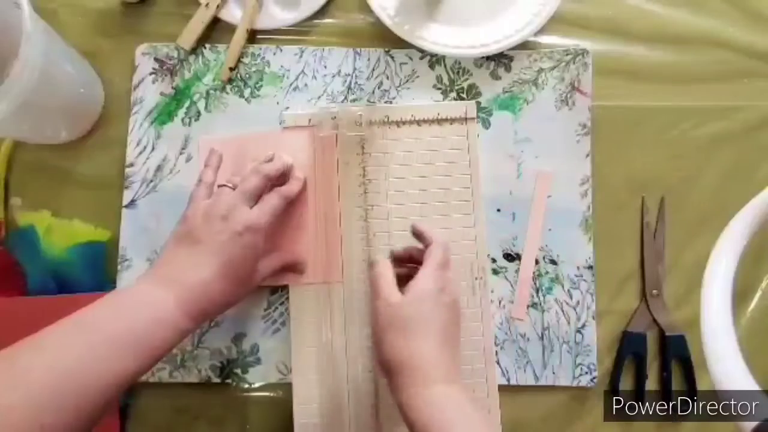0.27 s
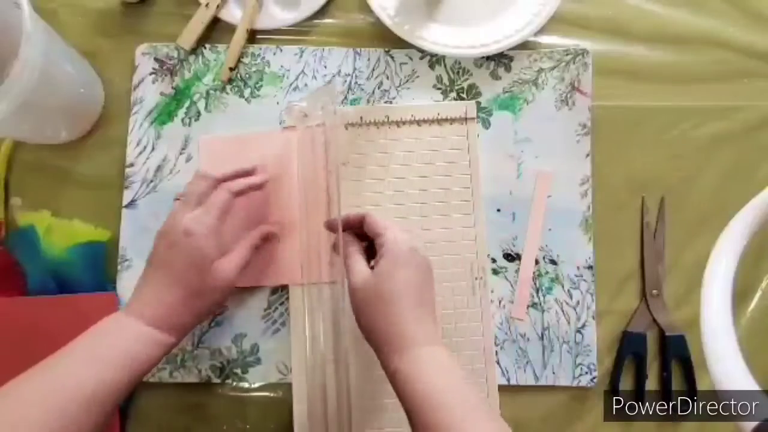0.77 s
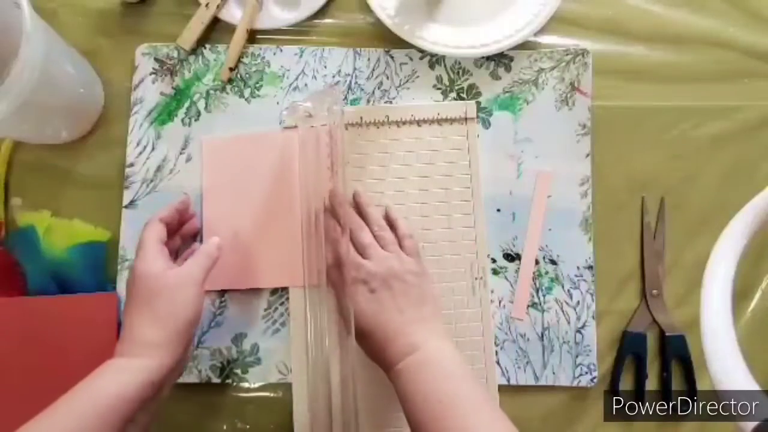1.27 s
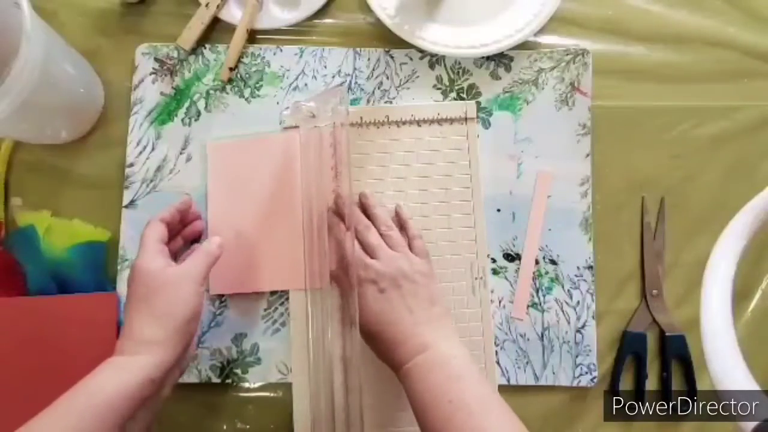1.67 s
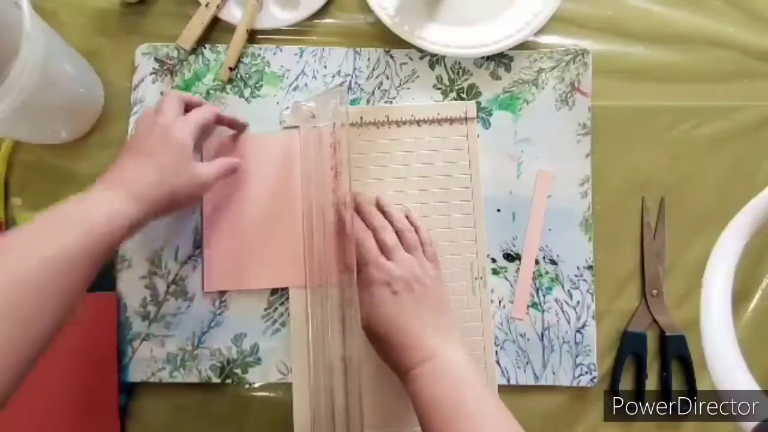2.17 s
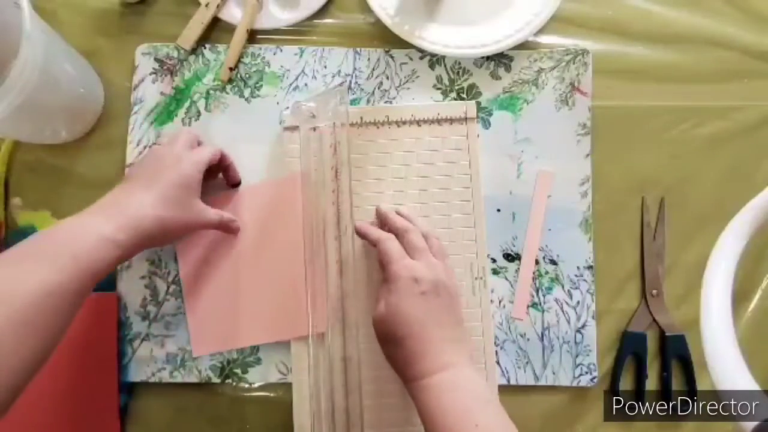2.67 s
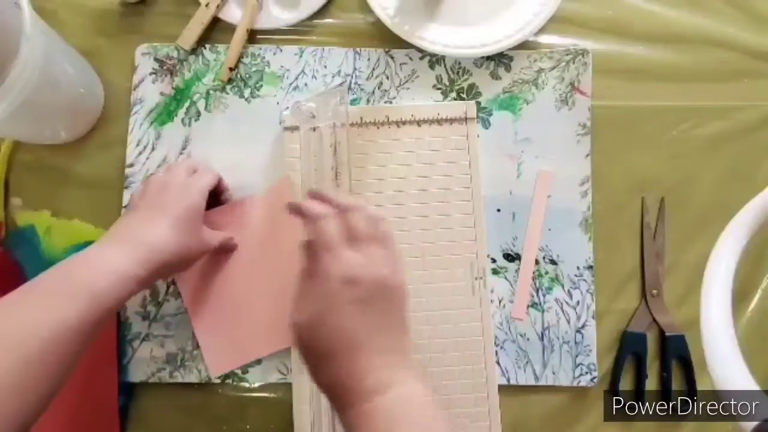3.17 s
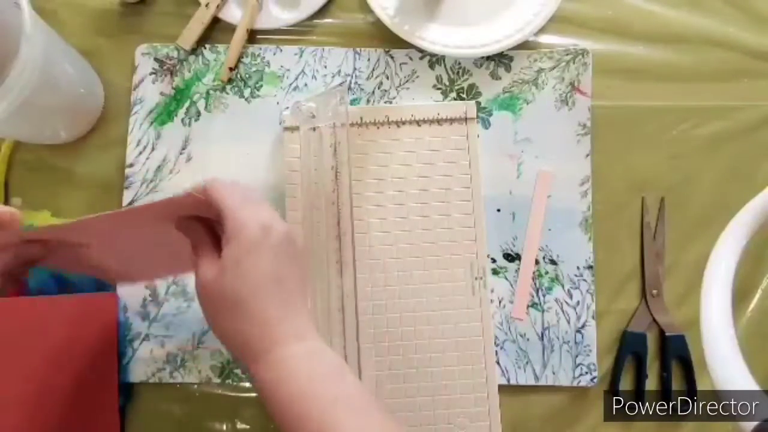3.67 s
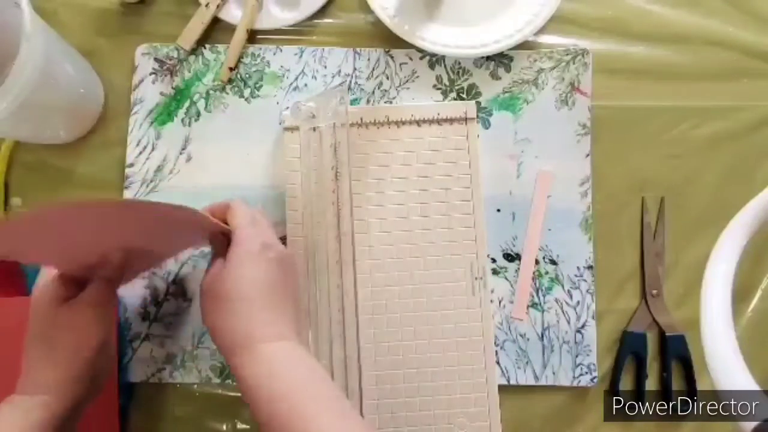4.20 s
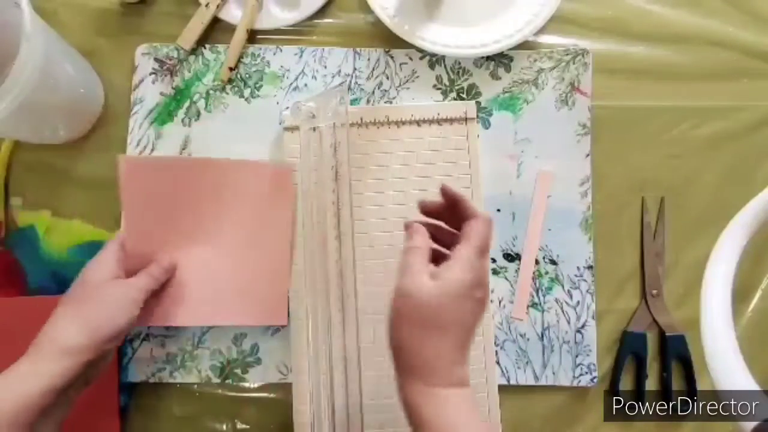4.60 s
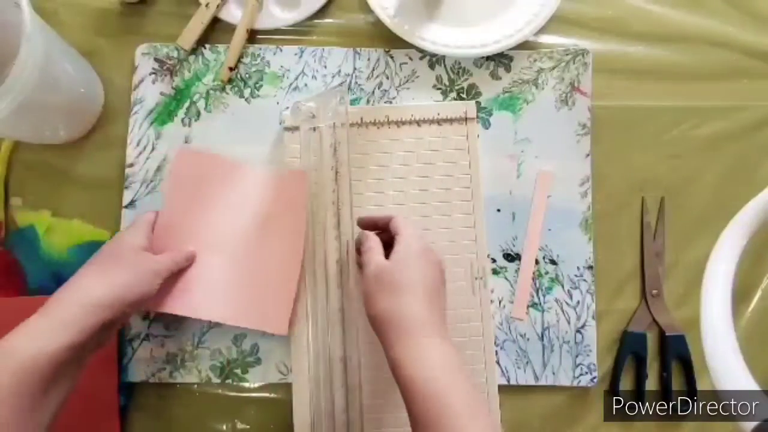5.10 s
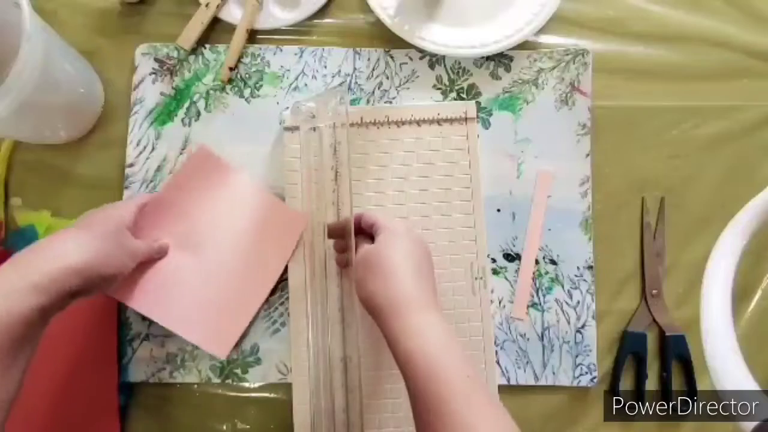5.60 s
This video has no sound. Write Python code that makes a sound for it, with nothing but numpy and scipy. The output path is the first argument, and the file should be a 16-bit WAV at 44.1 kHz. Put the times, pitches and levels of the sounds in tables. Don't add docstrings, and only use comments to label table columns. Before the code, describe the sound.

Close view of a table in a small room: a paper trimmer's rail slams at the very start, rattling briefly. Two light knocks follow, then faint rubbing of fingers on card. The card scrapes out from under the rail, then is lifted and flexed with crisp snaps, a soft flap and taps, ending in sparse light ticks over low hum.

```python
import sys
import numpy as np
from scipy import signal
from scipy.fft import rfft, irfft, next_fast_len
from scipy.io import wavfile
from scipy.ndimage import uniform_filter1d, map_coordinates

SR = 44100
rng = np.random.default_rng(int(sys.argv[2]) if len(sys.argv) > 2 else 0)


def field_ratio(decibels):
    return 10 ** (np.asarray(decibels, dtype=float) / 20)


def store_pcm(level_fs):
    pcm = np.round(np.clip(level_fs, -1, 1) * 32767).astype(np.int16)
    wavfile.write(sys.argv[1], SR, np.atleast_2d(pcm).T)


N = 257984

# [f/Hz, T60/s]
SLAM_SPECTRUM = [(15, -25), (30, -4.5), (130, -19.5), (300, -11.5), (450, -5), (720, -18.5), (1100, -13.5),
                 (1400, -25), (1750, -15), (3240, -25), (6680, -26), (15400, -23.5)]
SLAM_T60 = [(40, 0.54), (280, 0.35), (740, 0.36), (2000, 0.27), (5000, 0.28), (13000, 0.26)]
SLAM_MODES = [(1750, 61, 0), (2240, 28, -3), (2480, 130, -4), (3600, 91, -7), (3870, 56, -9),
              (4530, 47, -7), (5670, 100, -11), (6740, 45, -8)]
# [t/s, level/dB, f/Hz, T60/s]
THUMPS = [(0.00097, -33.5, 35, 0.22), (0.055, -41, 62, 0.12), (0.085, -39.5, 55, 0.11),
          (0.58, -47.5, 530, 0.046), (0.74, -51, 520, 0.04), (4.2115, -38, 940, 0.015),
          (4.2178, -39, 460, 0.03), (3.9545, -36.5, 330, 0.04), (0.3952, -41, 560, 0.017),
          (0.48, -44, 127, 0.11), (0.4122, -28, 557, 0.035), (0.4418, -27.5, 450, 0.03),
          (2.3015, -41, 168, 0.06), (2.293, -35, 73, 0.2), (2.292, -36, 175.4, 0.079),
          (0.611, -59, 2420, 0.06), (0.614, -52.5, 560, 0.05), (0.74, -56.5, 2400, 0.066),
          (0.86, -50.5, 490, 0.094), (2.751, -50.5, 503, 0.19)]

# [f/Hz, bandwidth/Hz, level/dB]
HUM_LOAD = [(0, -68), (.42, -62), (.73, -67), (1.21, -60), (2.2, -56), (2.3, -51), (2.59, -48.5),
            (2.83, -58.5), (3.27, -58), (3.63, -68), (3.84, -53), (4.56, -70.5), (5.85, -61.5)]
HUM_TONES = [(147.6, 24.7, -67.5), (257.2, 4, -80), (306.6, 7, -77)]
# [f/Hz, level/dB]
RUMBLE_SPECTRUM = [(12, -35.5), (25, -3), (50, 1.5), (80, -6), (110, -5.5), (200, -47.5)]
CREAK_SPECTRUM = [(80, -53.5), (115, 4.5), (160, -2.5), (250, -3.5), (400, -43.5)]
AIR_SPECTRUM = [(120, -33), (200, -10), (358, 5), (437, -22), (524, -6), (584, -26), (1010, -27),
                (1170, -36), (15400, -53.5)]
# [peak t/s, rumble level/dB, rise/s, fall/s, creak over rumble/dB]
LEANS = [
    (.06, -39, 0.18, 0.084, -7),
    (.6, -60, 0.57, 1.7, -14),
    (3.84, -51, 0.39, 0.57, -3),
    (4.03, -54.5, 0.5, 2.3, -15.5),
    (5.5, -44.5, 0.078, 0.37, -31),
]

# [f/Hz, bandwidth/Hz, level/dB]
SHEET = [(1588, 770, -4.5), (2050, 347, 1.5), (2445, 560, -4.5)]
RAIL = [(2827, 790, 0), (3220, 646, 4), (3810, 1120, -1)]
EDGE = [(5610, 2960, 1.5), (6430, 88, -10), (9030, 2300, -5.5), (12260, 8200, -1.5)]
BOARD = [(300, 203, -3), (423, 74, 2.5), (555.6, 105, 0), (770.3, 31, 1.5), (968, 190, -5)]
HOLLOW = [(295, 34, 1.5), (423, 286, -2.5), (544, 123, 1.5), (1150, 380, -13.5)]
CARD = [(425, 73, 3.5), (650, 180, -3.5), (980, 320, 6), (1220, 760, -1)]

DRAGS = [(.27, -79, 0.22, 0.22), (.425, -50, 0.026, 0.052), (1.21, -66.5, 0.047, 0.23),
         (1.41, -64.5, 0.079, 0.074), (1.52, -61, 0.14, 0.12), (1.66, -73, 0.092, 0.13),
         (1.9, -66.5, 0.11, 0.26), (2.33, -59, 0.025, 0.32), (2.534, -49, 0.19, 0.056),
         (2.881, -49, 0.03, 0.051), (3.012, -61.5, 0.019, 0.028), (3.245, -52, 0.011, 0.15),
         (3.35, -55.5, 0.32, 0.42), (3.5, -73, .21, .41), (3.724, -60.5, 0.55, 0.11),
         (3.957, -47, 0.006, 0.07), (4.179, -52.5, 0.04, .2), (4.24, -53, 0.16, 0.14),
         (4.47, -47.5, 0.02, 0.086), (4.691, -57, 0.05, .04), (4.781, -63, 0.036, 0.047),
         (5.03, -64, 0.069, 1), (5.246, -56, 0.033, 0.033), (5.366, -57.5, 0.07, 0.037),
         (5.577, -56.5, 0.16, 0.054), (5.741, -56, 0.11, 0.16)]
SCRAPES = [(0.743, -71, 0.027, 0.029), (1.2, -68, 0.064, 0.13), (1.29, -69.5, 0.14, 0.076),
           (1.53, -67, 0.051, 0.067), (2.07, -63, 0.036, 0.032), (2.295, -54, 0.011, 0.046),
           (2.341, -42, 0.008, 0.11), (2.385, -48, 0.088, 0.072), (2.534, -53.5, 0.31, 0.2),
           (3.078, -51.5, 0.0044, 0.2), (2.751, -53.5, 0.018, 0.11), (2.97, -68, .12, 0.16),
           (3.47, -58, 0.049, 0.11), (3.71, -61, 0.11, 0.11), (4.097, -59.5, 0.041, 0.039),
           (4.399, -57, .08, 0.036), (5.45, -64, 0.028, 0.078), (5.79, -63.5, 0.14, 0.097)]
BRUSHES = [(0.406, -54.5, 0.02, 0.096), (.71, -69.5, 0.013, 0.12), (.98, -74.5, 0.098, 0.11),
           (1.171, -64.5, .025, 0.044), (1.3, -72.5, 0.015, 0.097), (1.795, -75.5, 0.059, 0.078),
           (1.556, -69, 0.13, 0.2), (1.662, -68.5, 0.14, 0.067), (1.898, -62.5, 0.052, .18),
           (2.215, -73.5, 0.03, 0.061), (2.44, -58, 0.16, 0.21), (2.534, -62, 0.16, 0.17),
           (2.79, -62.5, 0.049, 0.089), (2.96, -68, 0.15, 0.055), (3.227, -52.5, 0.23, 0.49),
           (3.303, -44, 0.0092, 0.06), (3.5, -54, 0.095, 0.071), (3.61, -58, 0.14, 0.42),
           (3.705, -54.5, 0.02, 0.096), (3.956, -66, .005, 0.037), (4.1, -61, 0.066, 0.057),
           (4.232, -57, 0.033, 0.19), (4.31, -56.5, 0.021, 0.025), (4.395, -61.5, 0.039, 0.051),
           (4.48, -59, 0.015, 0.055), (4.62, -75, 0.22, 0.046), (4.781, -69, 0.027, 0.015),
           (5.06, -71.5, 0.028, 0.58), (5.34, -68, 0.17, 0.33), (5.75, -64, 0.17, 0.2)]
PRESSES = [(0.4, -43.5, 0.012, 0.066), (.47, -53.5, 0.089, 0.14), (.627, -62.5, 0.025, 0.051),
           (.742, -62.5, 0.088, 0.13), (1.008, -64, 0.027, 0.057), (1.21, -65, 0.11, 0.61),
           (1.33, -64.5, 0.45, 0.1), (1.556, -58, 0.11, 0.065), (1.842, -71, 0.053, 0.052),
           (2.05, -72.5, 0.2, 0.17), (2.299, -46, 0.013, 0.16), (2.35, -51, 0.063, 0.33),
           (2.6, -57.5, 0.5, 0.31), (2.764, -52.5, 0.02, 0.068), (2.881, -52, 0.032, 0.055),
           (3.015, -62, 0.12, 0.094), (3.079, -49, .004, 0.25), (3.2, -53.5, 0.19, 0.049),
           (3.354, -53, 0.13, 0.29), (3.55, -64, 0.21, .2), (3.8, -63, 0.29, 0.22),
           (3.955, -44.5, 0.018, 0.1), (4.097, -56, .13, 0.12), (4.23, -48, 0.035, 0.097),
           (4.474, -50, 0.031, 0.095), (4.69, -74, 0.4, 0.5), (5.13, -65, 0.061, 0.21),
           (5.577, -70, .13, 0.14)]
# [sheet level/dB, rail level/dB, edge level/dB, body level/dB]
COUPLING = [
    (-2, -11.5, -10.5, -18.5),
    (-5, -1.5, -26, -20),
    (-9, -7.5, 1.5, -31),
    (-11, -23, -22.5, -1.5),
]

# [peak t/s, level/dB, rise/s, fall/s, f/Hz]
SQUEAKS = [(1.19, -66, 0.059, 0.14, 2950), (1.23, -76, .06, .15, 3900), (1.24, -68, .05, .08, 1980),
           (1.42, -69, .06, 0.11, 2150), (1.52, -72, 0.062, .1, 2900), (1.63, -73, .15, .15, 6200),
           (3.15, -49.5, 0.058, 0.097, 570), (3.39, -56, .04, .05, 780), (3.47, -60.5, .03, .07, 2200),
           (3.5, -62, .06, .04, 3300), (3.579, -57, 0.018, .03, 3100), (3.6, -60.5, .1, 0.085, 2200),
           (3.64, -59, .06, .05, 5700), (3.72, -61, .04, 0.033, 1500), (3.75, -58.5, 0.073, 0.053, 400),
           (3.84, -59, 0.16, 0.15, 240), (3.86, -58, .05, 0.075, 320), (3.9, -50, 0.024, 0.074, 280),
           (2.365, -40.5, .04, 0.055, 3600), (2.36, -51, 0.044, 0.13, 1700), (3.1, -57, 0.046, 0.17, 380),
           (3.28, -50, 0.059, .06, 2100), (2.68, -63, .03, .06, 3500), (1.93, -67, 0.064, .12, 1800),
           (.58, -71.5, .02, .05, 1700), (5.0, -67.5, .03, 0.045, 2200), (4.25, -56, .04, .06, 400),
           (5.74, -60, 0.049, .05, 3950), (5.8, -61, .04, 0.036, 2000)]
# [peak t/s, level/dB, rise/s, fall/s, f/Hz]
WHISTLES = [
    (.3, -82, .08, .12, 4650),
    (.25, -79, .06, .08, 2600),
    (0.98, -73, 0.072, .06, 7100),
    (0.5, -80, .2, 0.27, 6450),
]

# [t/s, level/dB, f/Hz, knock/dB, T60/s]
SCUFFS = [
    (.3865, -56.5, 1430, 11, 0.064),
    (.5576, -59.5, 1530, -19, 0.052),
    (1.0864, -60, 1460, 8, 0.019),
    (2.7496, -48.5, 3270, -5, 0.14),
]
# [t/s, level/dB, f/Hz, knock/dB, T60/s]
TAPS = [(.4116, -39.5, 3400, 7, 0.092), (.4415, -45, 2500, 9, 0.032), (.7384, -61, 2590, 11, 0.025),
        (2.2907, -49, 2600, -4.5, 0.037), (2.3016, -37, 2750, -7.5, 0.011), (3.0101, -54, 2560, 6.5, 0.046),
        (3.0766, -49, 2050, 1, 0.005), (4.2094, -43, 1530, 7, 0.052), (4.2175, -36.5, 2700, -2, 0.01),
        (4.4632, -38, 2000, 1.5, 0.037), (4.4995, -54.5, 2080, 14, 0.056)]
# [t/s, level/dB, f/Hz, bright crack/dB, T60/s]
SNAPS = [(1.1652, -70, 3870, 25.5, 0.014), (2.0192, -60, 1920, 7, 0.018), (2.3635, -53, 3550, -43.5, .0047),
         (2.62, -47, 3700, -29, 0.013), (2.8672, -38.5, 3000, 0, 0.012), (2.8878, -39, 2240, 4.5, 0.0031),
         (3.24, -31, 2180, 5, 0.016), (3.248, -32.5, 2250, 7, 0.025), (3.9374, -27.5, 2630, -37.5, 0.0031),
         (3.9525, -31, 2630, -14, 0.015), (4.1595, -43, 3870, -14, 0.0096),
         (4.1764, -38.5, 3300, 0, 0.0056), (4.197, -42, 1900, -28, 0.024),
         (4.2353, -30.5, 2570, -24, 0.0056), (4.477, -35.5, 2050, -5, 0.015), (5.047, -52, 2900, 0, 0.047),
         (5.2316, -36, 2300, -4.5, 0.019), (5.2365, -47, 2200, -25, 0.04), (5.2553, -49.5, 2600, 2, 0.035),
         (5.317, -48.5, 2720, -26, 0.014), (5.447, -50, 2320, -23, 0.026)]
# [t/s, level/dB, f/Hz, bright crack/dB, T60/s]
TICKS = [(0.4125, -38.5, 3660, -3, 0.014), (.4425, -43, 4880, -6, 0.013), (.706, -62, 2300, 4, .01),
         (1.3, -57, 4400, -13, 0.024), (2.2915, -42, 3220, -2, .008), (2.3362, -39, 3600, -9, .015),
         (2.3635, -40, 3710, -20, .008), (2.996, -51, 3600, -10, .01), (3.0102, -51, 2700, -3, 0.009),
         (3.0755, -47, 2900, -6, .01), (3.2402, -28.5, 6140, -3, .01), (3.247, -28, 2400, -3, 0.011),
         (3.3012, -36, 2930, 2, .01), (3.9431, -38, 2940, -12, .015), (3.9468, -39, 2800, -12, .01),
         (3.9572, -33, 2770, -3.5, 0.0057), (4.0757, -52, 2300, -10, .01), (4.171, -41, 3900, 3, 0.01),
         (4.183, -43, 3600, -15, .015), (4.196, -35, 2330, -9, 0.0091), (4.242, -37, 2700, -15, 0.013),
         (4.4725, -28, 3000, -1, 0.0074), (4.212, -38, 2950, -18, 0.0087),
         (4.4759, -24, 2280, -11.5, 0.008), (4.673, -57, 2400, -10, .012),
         (5.2352, -38.5, 2275, -15, 0.018), (5.2585, -48, 2720, -8, 0.0086), (5.264, -51, 2200, -10, .01),
         (5.333, -49, 2700, -15, .015), (5.351, -48, 2200, -6, .012), (5.4428, -43.5, 2600, -10, 0.0074),
         (5.567, -53, 2300, -12, 0.013), (5.755, -48, 2410, -10, .012)]
# [f/Hz, level/dB]
CRACK = [(6300, -4.5), (9300, -4), (12500, -3)]
# [peak t/s, level/dB, rise/s, fall/s]
FLAP = [
    (3.82, -50, 0.15, 0.27),
]

# [f/Hz, T60/s]
ROOM_T60 = [(200, 0.28), (2000, 0.27), (12000, 0.18)]
# [f/Hz, level/dB]
MIC = [(20, 1), (7000, -1), (10000, -7.5), (13000, -11), (15500, -17)]

SETTLED_S, LIFTED_S = 0.9, 3.9
HELD_FROM_S, HELD_TO_S = 4.44, 4.92
ROUND = 1.234
TIME_S = np.arange(N) / SR


def unit(x):
    return x / np.sqrt(np.mean(x ** 2) + 1e-20)


def along(points, hz):
    f, v = np.transpose(points)
    return np.interp(np.log(hz + 1), np.log(f + 1), v)


def wobble(rate):
    knots = rng.standard_normal(int(N * rate / SR) + 4)
    return map_coordinates(knots, [np.arange(N) * rate / SR])


def filtered(x, response):
    m = next_fast_len(len(x) + SR // 8)
    spectrum = rfft(x, m) * response(np.fft.rfftfreq(m, 1 / SR))
    return irfft(spectrum, m)[:len(x)]


def ringing(modes):
    def response(f):
        total = 0
        for k, (centre, width, db) in enumerate(modes):
            damping = 1j * f * width
            total = total + (-1) ** k * field_ratio(db) * damping / (centre * centre - f * f + damping)
        return total
    return response


def hiss(spectrum):
    return unit(filtered(rng.standard_normal(N), lambda hz: field_ratio(along(spectrum, hz))))


def dying(t60s, seconds):
    hz, t, z = signal.stft(rng.standard_normal(int(seconds * SR)), SR, nperseg=256)
    t60 = np.clip(along(t60s, hz), .02, 2)[:, None]
    return signal.istft(z * field_ratio(-60 * t / t60), SR, nperseg=256)[1]


def strokes(rows):
    t = np.arange(0, N + 64, 64) / SR
    peak, db, rise, fall = (c[:, None] for c in np.transpose(rows)[:4])
    distance = np.maximum((peak - t) / rise, (t - peak) / fall)
    power = field_ratio(db - 20 * distance ** ROUND) ** 2
    return np.interp(TIME_S, t, power.sum(axis=0))


def slam():
    modes = ringing([(hz, width, 0) for hz, width, _ in SLAM_MODES])
    tail = dying(SLAM_T60, seconds=.6)
    tail = filtered(tail, lambda hz: field_ratio(along(SLAM_SPECTRUM, hz)) * (1 + 1.36 * abs(modes(hz))))
    tail = tail / np.std(tail[:SR // 20])
    return field_ratio(-27) * np.pad(tail, (0, N))[:N]


def rail_bounces():
    rate_hz = np.minimum(152.1 + 1750 * TIME_S, 301)
    rest_s, rest_db_per_s = 0.077, 802
    db = -27 - 70 * np.clip(.035 - TIME_S, 0, None) - rest_db_per_s * np.clip(TIME_S - rest_s, 0, None)
    phase = 2 * np.pi * np.cumsum(rate_hz) / SR
    cavity = ringing([(455, 150, 0)])
    bounces = np.zeros(N)
    for k in range(1, 5):
        hz = k * rate_hz
        gain = (0.36 * 200 / hz + abs(cavity(hz))) / (1 + (hz / 600) ** 8)
        bounces += gain * np.cos(k * phase)
    return field_ratio(db + 1.3 * wobble(57)) * bounces


def motor_hum():
    load_t, load_db = np.transpose(HUM_LOAD)
    load = np.interp(TIME_S, load_t, load_db)
    pitch_hz = 102.3 + 0.52 * wobble(1.305) + 0.71 * wobble(12)
    phase = 2 * np.pi * np.cumsum(pitch_hz) / SR
    hum = np.sqrt(2) * field_ratio(load - 0.7 + 3.0 * wobble(6.4)) * np.sin(phase)
    for hz, width, db in HUM_TONES:
        hum += field_ratio(db) * unit(filtered(rng.standard_normal(N), ringing([(hz, width, 0)])))
    return hum


def table_groans():
    rumble = np.sqrt(field_ratio(-62.5 + 2.4 * wobble(3.96)) ** 2 + strokes(LEANS))
    creak_s = 0.014
    pressed = abs(uniform_filter1d(strokes(PRESSES), size=int(creak_s * SR)))
    leaned = strokes([(s, db + over_db, rise, fall) for s, db, rise, fall, over_db in LEANS])
    creak = np.sqrt(field_ratio(-78) ** 2 + field_ratio(-10) ** 2 * pressed + leaned)
    return rumble * hiss(RUMBLE_SPECTRUM) + creak * hiss(CREAK_SPECTRUM)


def still_air():
    return field_ratio(-83.5) * hiss(AIR_SPECTRUM)


def thumps():
    out, t = np.zeros(N + SR), np.arange(SR // 2) / SR
    for s, db, hz, t60 in THUMPS:
        envelope = field_ratio(db - 60 * t / t60) * (1 - np.exp(-t / 0.00045))
        out[round(s * SR):][:len(t)] += envelope * np.sin(2 * np.pi * hz * t)
    return out[:N]


def patches(depth_db):
    z = signal.stft(rng.standard_normal(N), nperseg=1024)[2]
    field = 0
    for bands, frames in ((3, 6), (14, 9)):
        patch = uniform_filter1d(rng.standard_normal(z.shape), size=bands, axis=0)
        field = field + unit(uniform_filter1d(patch, size=frames, axis=1))
    return unit(signal.istft(z * field_ratio(depth_db * unit(field)), nperseg=1024)[1][:N])


def rubbing():
    clump = field_ratio(0.84 * wobble(45) + 1.22 * wobble(150))
    catch_db = np.minimum(4 * rng.exponential(size=N), 16)
    catches = (rng.random(N) < 900 / SR) * rng.choice([-1, 1], N) * field_ratio(catch_db)
    powers = [strokes(rows) for rows in (DRAGS, SCRAPES, BRUSHES, PRESSES)]
    sheet, rail, edge, body = np.sqrt(field_ratio(COUPLING).T ** 2 @ powers)
    settled = TIME_S >= SETTLED_S
    held = (TIME_S > HELD_FROM_S) & (TIME_S < HELD_TO_S)
    # level, resonances, share of catches, patch depth in dB, steepness of the valleys
    parts = [(sheet, SHEET, 0.37, 3, .5),
             (rail, RAIL, 0.42, 2.8, .8),
             (edge, EDGE, 0.21, 2.2, .3),
             (body * settled * ~held, BOARD, 0.4, 2.2, .3),
             (body * ~settled, HOLLOW, 0.14, 2.2, .3),
             (body * held, CARD, 0.19, 2.2, .1)]
    out = np.zeros(N)
    for level, modes, grit, patch_db, steep in parts:
        response = ringing(modes)
        force = clump * field_ratio(wobble(25.26)) * (patches(patch_db) + grit * unit(catches))
        once = filtered(force, response)
        out += level * unit(filtered(once, lambda hz: abs(response(hz)) ** steep))
    return out


def squeaks():
    out = np.zeros(N)
    rows = [(*row, .045) for row in WHISTLES] + [(*row, .15) for row in SQUEAKS]
    all_knots = rng.standard_normal((len(rows), 2, 512))
    for (s, db, rise, fall, hz, share), knots in zip(rows, all_knots):
        i = np.arange(max(int((s - 2 * rise) * SR), 0), min(int((s + 2 * fall) * SR), N))
        t = i / SR - s
        width_hz = 35 + share * hz
        a, b = (map_coordinates(k, [256 + t * width_hz], mode="wrap") for k in knots)
        swell = field_ratio(db - 20 * np.maximum(-t / rise, t / fall) ** ROUND)
        out[i] += swell * (a * np.cos(2 * np.pi * hz * t) + b * np.sin(2 * np.pi * hz * t))
    return out


def contacts(table, attack):
    out, t = np.zeros(N + SR), np.arange(SR // 8) / SR
    for s, db, hz, crack_db, knock_db, t60 in table:
        envelope = field_ratio(-60 * t / np.clip(t60, .004, .3)) * (1 - np.exp(-t / attack))
        buckle, crack, knock = rng.standard_normal((3, len(t))) * envelope
        knock[8] += 4
        pitch = ringing([(hz, .6 * hz, 0), (1.45 * hz, .7 * hz, -6)])
        below = ringing(HOLLOW if s < SETTLED_S else BOARD if s < LIFTED_S else CARD)
        buckle = filtered(buckle, lambda f: pitch(f) ** 2)
        crack = filtered(crack, ringing(EDGE))
        knock = filtered(knock, lambda f: below(f) / (1 + 1j * f / 1500))
        for part, part_db in ((buckle, 0), (crack, crack_db), (knock, knock_db)):
            out[round(s * SR):][:len(t)] += field_ratio(db + part_db) * part / abs(part).max()
    return out[:N]


def card_contacts():
    scuffs = [(s, db, hz, -28, knock_db, t60) for s, db, hz, knock_db, t60 in SCUFFS]
    taps = [(s, db, hz, -17, knock_db, t60) for s, db, hz, knock_db, t60 in TAPS]
    snaps = [(s, db, hz, crack_db, -40, t60) for s, db, hz, crack_db, t60 in SNAPS]
    return contacts(scuffs, attack=0.0029) + contacts(snaps + taps, attack=0.0003)


def ticks():
    out, t = np.zeros(N + SR), np.arange(SR // 20) / SR

    def fade(t60):
        return field_ratio(-60 * t / np.clip(t60, .002, .05)) * (1 - np.exp(-t / 0.00013))

    crack = sum(field_ratio(db) * np.sin(2 * np.pi * hz * t) for hz, db in CRACK)
    for s, db, hz, crack_db, t60 in TICKS:
        ring = np.sin(2 * np.pi * hz * t) + field_ratio(-7.5) * np.sin(2 * np.pi * 1.47 * hz * t)
        tick = ring * fade(t60) + field_ratio(crack_db) * crack * fade(.5 * t60)
        out[round(s * SR):][:len(t)] += field_ratio(db) * tick
    return out[:N]


def card_flap():
    rate_hz = np.clip(125.2 - 188 * (TIME_S - FLAP[0][0]), 98, 150)
    phase = 2 * np.pi * np.cumsum(rate_hz) / SR
    return np.sqrt(strokes(FLAP)) * (np.sin(phase) + 0.1303 * np.cos(2 * phase))


def room(x):
    tail = dying(ROOM_T60, seconds=.4)
    return signal.fftconvolve(np.pad(x, (300, 0)), tail / np.linalg.norm(tail))[:N]


def scene():
    hits = rail_bounces() + card_contacts() + ticks() + card_flap()
    mix = slam() + hits + field_ratio(-10) * room(hits)
    mix += motor_hum() + table_groans() + still_air()
    mix += thumps() + rubbing() + squeaks()
    return mix[None]


def roll_off(x):
    return signal.sosfilt(signal.butter(12, 15520, fs=SR, output="sos"), x)


def record(dry):
    top_hz = 15500
    mix = filtered(dry[0], lambda hz: field_ratio(along(MIC, hz)) * (hz < top_hz))
    return roll_off(mix[None])


dry = scene()
out = record(dry)
store_pcm(out)
```